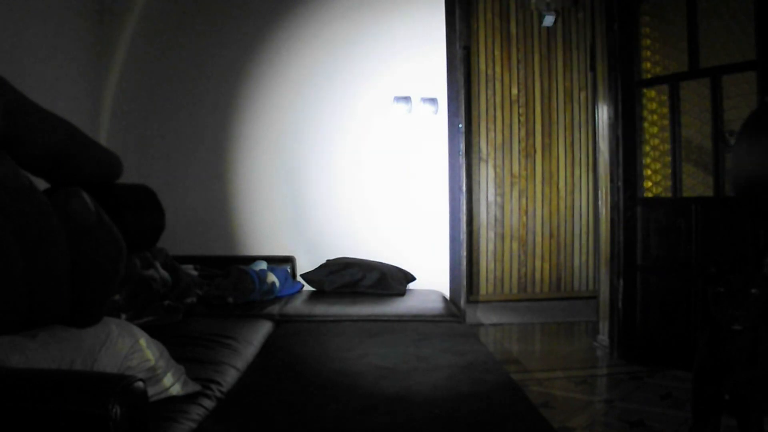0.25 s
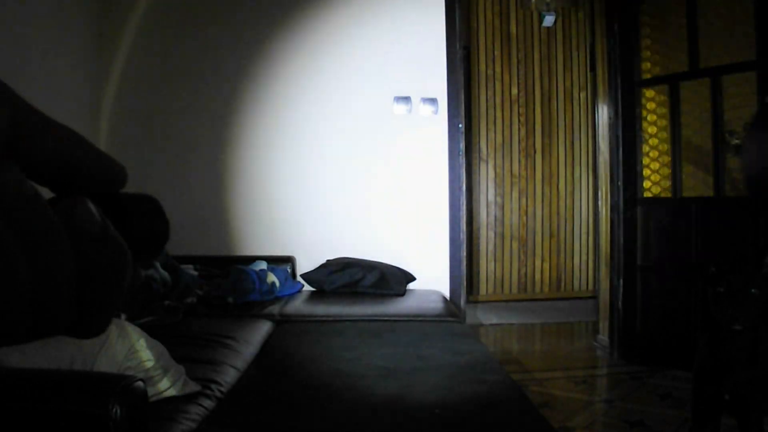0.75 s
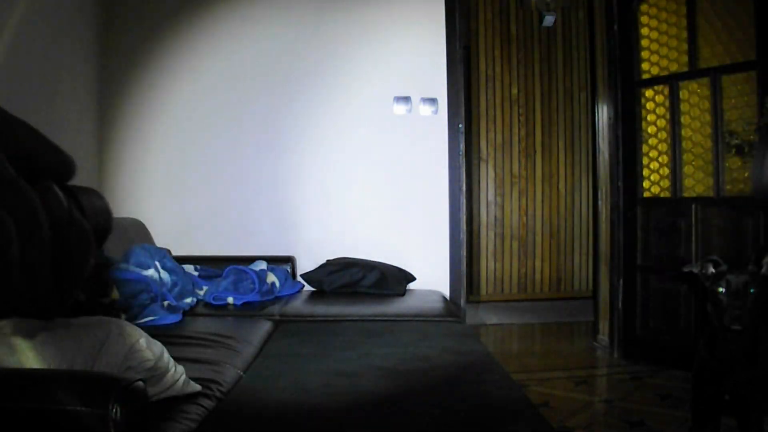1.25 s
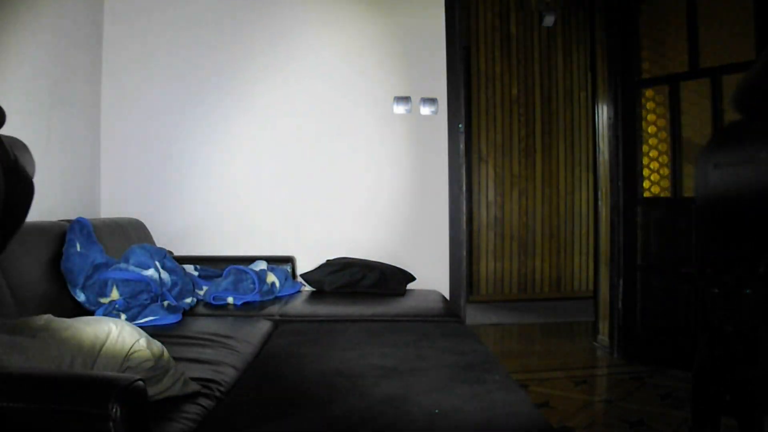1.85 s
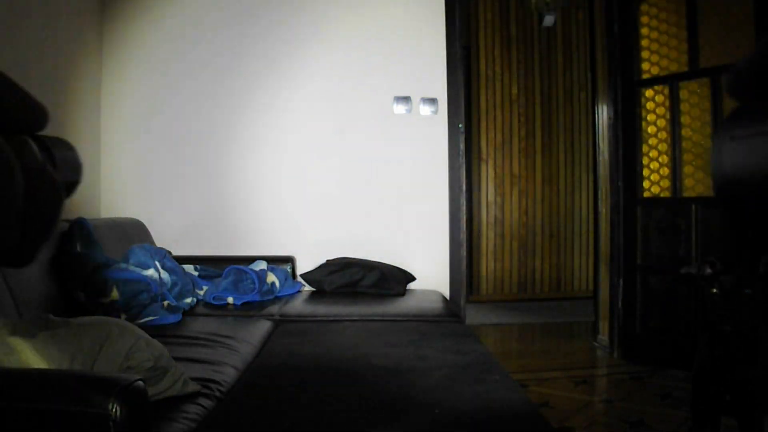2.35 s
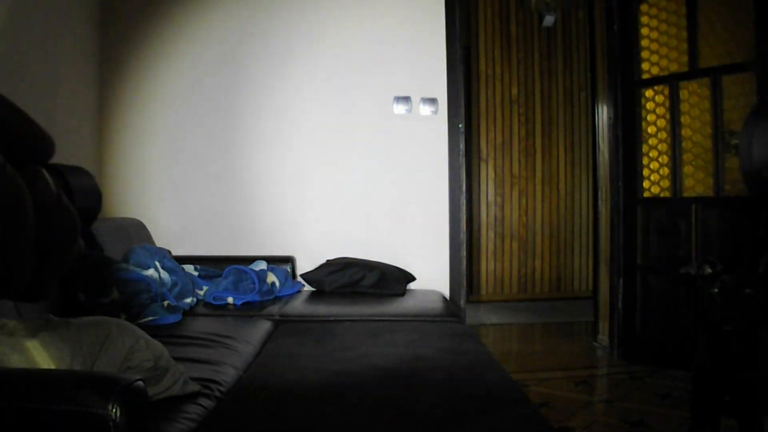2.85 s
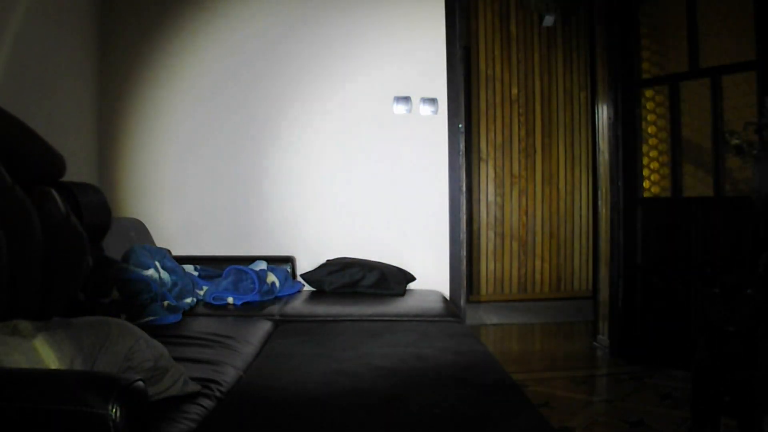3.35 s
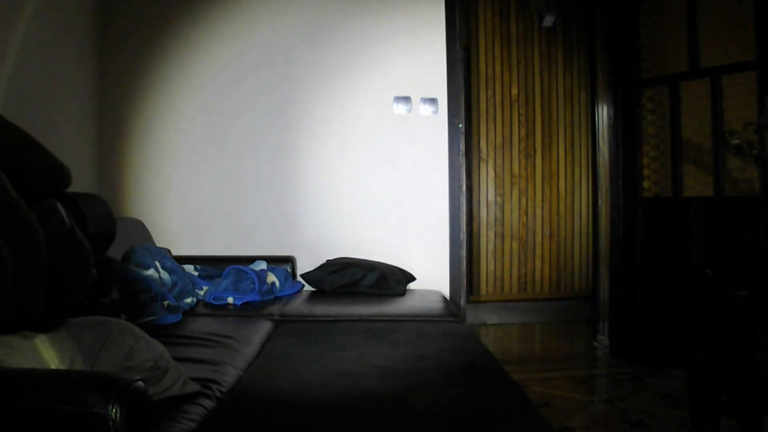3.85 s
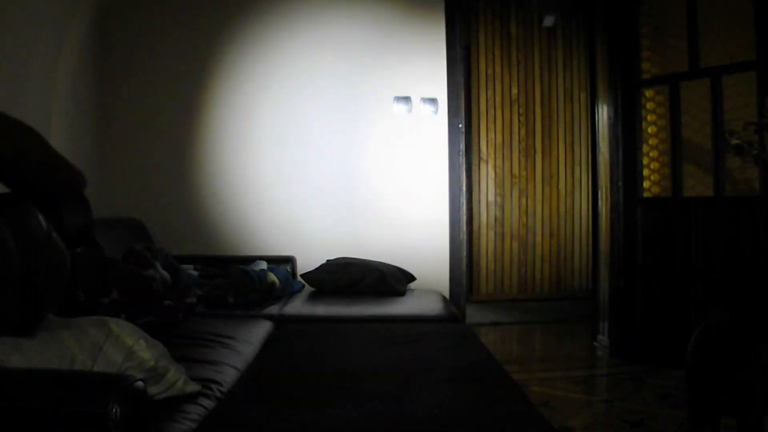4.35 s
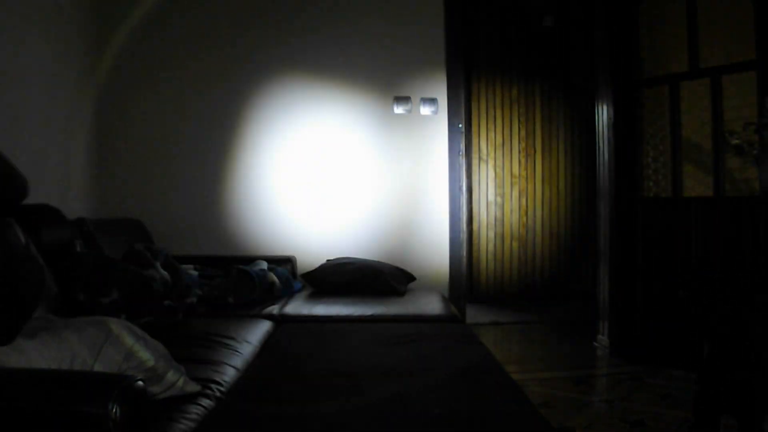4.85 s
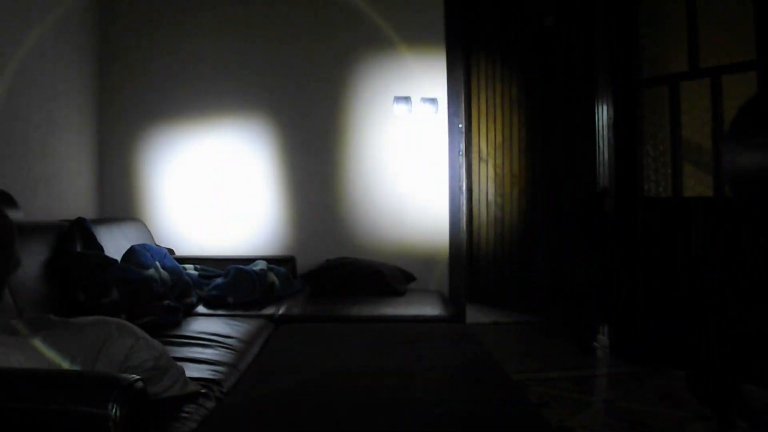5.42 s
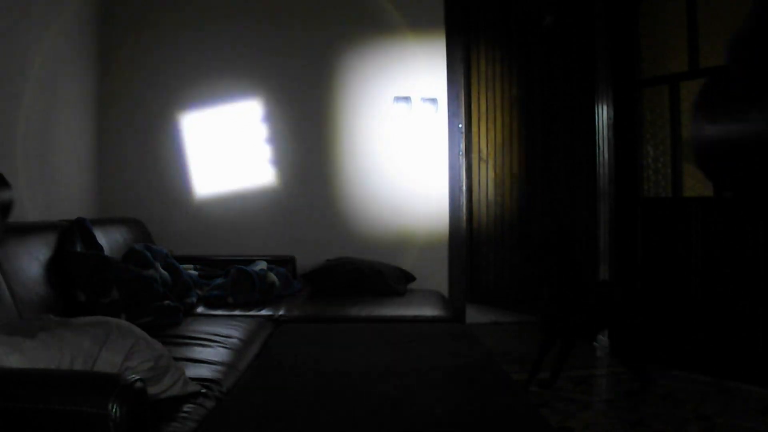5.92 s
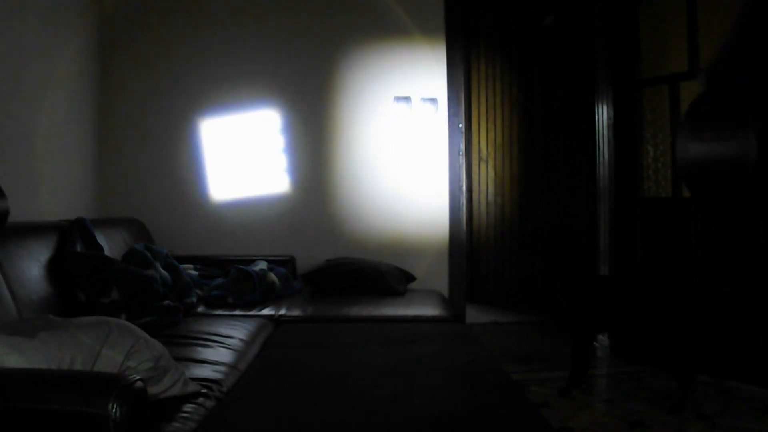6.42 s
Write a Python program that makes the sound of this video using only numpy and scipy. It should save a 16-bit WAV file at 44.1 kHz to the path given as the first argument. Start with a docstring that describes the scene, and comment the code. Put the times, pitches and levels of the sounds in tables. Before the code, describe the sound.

Close to a mono microphone in a small living room, flashlight buttons are clicked in hard, bright, irregular bursts. The loose button rattles and rubs under the thumb, and a spring pings faintly. The busiest, loudest clicking comes around three to five seconds, then sparse clicks, dull handling bumps and three final snaps. Faint hiss and low rumble continue throughout.

```python
"""Flashlight switches are clicked in quick, rattling runs in a small living room.
Each contact is a short noise crack in the hollow torch body, the brighter the harder it is.
A spring pings now and then, and a smaller switch chimes: both are fading, wavering sines.
The thumb drags and rattles the loose button along: shaped noise and small ticks.
Two dull bumps, the room's echo, a low rumble and a faint steady hiss reach a mono microphone."""
import sys
import numpy as np
from scipy import signal
from scipy.fft import rfft, irfft, next_fast_len
from scipy.io import wavfile
from scipy.ndimage import uniform_filter1d

SR = 44100
rng = np.random.default_rng(int(sys.argv[2]) if len(sys.argv) > 2 else 0)


def to_wav(sig):
    """Store sig (one row per channel, or 1-D mono) as 16-bit WAV at the path in sys.argv[1].

    Samples outside -1..1 are clipped; the rate is SR.
    """
    pcm = np.clip(np.atleast_2d(sig), -1, 1) * 32767
    pcm = np.round(pcm).astype(np.int16)
    wavfile.write(sys.argv[1], SR, pcm.T)  # frames by channels


N = 294573

# contacts of the smaller, thinner switch: start_s, level_db (before a common trim),
# hardness_db (snap register against main register)
SMALL_SWITCH_CLICKS = [(4.212, -32.5, 3), (4.222, -21, -28), (4.228, -16, -17), (4.247, -32.5, -2.5),
                       (4.27, -34, -3), (4.528, -27, -12), (4.545, -19, -25), (4.555, -17, -28),
                       (4.566, -24.5, -7.5), (4.615, -32, -4.5), (4.886, -28.5, -8), (5.697, -27, -14),
                       (5.75, -29, -6.5), (5.798, -26.5, -17), (5.831, -27.5, -8), (5.87, -32.5, -37)]
# strokes of the thumb over button and casing: start_s, length_s, level_db (at the start of the stroke)
THUMB_STROKES = [(0, 0.054, -41), (0.264, 0.18, -31.5), (0.717, .1, -36.5), (0.842, 0.057, -35.5),
                 (1.347, 0.19, -44), (1.907, 0.066, -51.5), (2.514, 0.031, -37.5), (2.833, 0.034, -30),
                 (2.901, 0.11, -36), (3.207, 0.028, -30), (3.269, 0.056, -26.5), (3.567, 0.039, -30.5),
                 (3.621, 0.076, -25), (3.922, 0.013, -29), (3.959, 0.052, -28.5), (4.194, .05, -27),
                 (4.401, 0.083, -29), (4.522, 0.087, -30), (4.753, 0.12, -33.5), (5.584, 0.32, -41),
                 (6.136, 0.4, -47), (6.465, 0.085, -27)]
STROKE_SAG_DB = 6  # the thumb eases off by this much over the stroke's length


def amp(db):
    """Amplitude factor of a level in dB."""
    return 10 ** (np.asarray(db) / 20)


def unit(x):
    """Scaled to rms 1."""
    return x / np.sqrt(np.mean(x ** 2) + 1e-20)


def along(points, hz):
    """(Hz, value) points read on a log frequency axis."""
    f, v = np.transpose(points)
    return np.interp(np.log(hz + 1), np.log(f + 1), v)


def curve(rows):
    """(s, value) rows as one value per sample."""
    return np.interp(np.arange(N) / SR, *np.transpose(rows))


def filtered(x, response):
    """x shaped by a response of frequency."""
    m = next_fast_len(len(x) + SR // 20)
    spectrum = rfft(x, m) * response(np.fft.rfftfreq(m, 1 / SR))
    return irfft(spectrum, m)[:len(x)]


def resonances(modes, f):
    """Causal response of (Hz, width Hz, dB) modes, added with alternating sign."""
    total = 0
    for k, (centre, width, db) in enumerate(modes):
        damping = 1j * f * width
        total = total + (-1) ** k * amp(db) * damping / (centre * centre - f * f + damping)
    return total


def noise(colour):
    """Noise of rms 1 with the given spectral shape."""
    return unit(filtered(rng.standard_normal(N), lambda f: amp(along(colour, f))))


def add(track, s, sound):
    """Mix a sound into the track from time s on."""
    start = max(0, round(s * SR))
    part = track[start:start + len(sound)]
    part += sound[:len(part)]


def contact(band_db, ring_hz, lead, soft_stretch):
    """The button slides, snaps home and chatters; the hollow body colours the crack."""
    # registers of a click (main, knock, snap, sheen): low_hz, high_hz
    registers = [(2050, 6000), (450, 1900), (6000, 10500), (10500, 14200)]
    # resonances of the torch body: centre_hz, width_hz, level_db
    body_modes = [(370, 1500, -16.5), (963, 926, -6), (1550, 860, -4), (2120, 434, -2.5), (2619, 114, 6),
                  (2661, 102, 8), (3044, 282, 5.5), (3616, 230, 3.5), (3910, 300, 2), (5050, 590, -1.5),
                  (7250, 493, 4.5), (9350, 820, 0), (11660, 680, -1.5), (13840, 300, -1.5)]
    rise_s, crack_s = 0.00046, 0.0005  # of a hard snap
    slide_db, slide_s = -17, 0.0066  # before the snap
    chatter_db, chatter_s = -15, 0.0067  # after it
    heavy_from_db, heavy_slope = -21.5, 0.66  # above this level: dB more chatter per dB
    grain_db, evenness, strike_db = 6, 0.093, 3
    ring_db, soft_ring, ring_width_hz = -2, 0.86, 520  # soft_ring: dB more ring per dB of softness
    hard_corner_hz, softness_per_octave_db = 10700, 18.3  # a soft contact loses its highs

    t = np.arange(-round(lead * SR), SR // 25) / SR
    # a softer contact sounds the cavity more; where stretched, it also lasts longer
    softness_db = max(0, band_db[0] - band_db[2] - 6.5)
    snap_s = np.where(t < 0, rise_s, crack_s)
    snap = np.exp(-abs(t) / snap_s / (1 + soft_stretch * softness_db))

    # slide and chatter are many tiny catches of uneven strength
    catches = unit(filtered(rng.standard_normal(len(t)), lambda f: f < 600))
    heavy_db = heavy_slope * max(0, band_db[0] - heavy_from_db)
    slide = amp(slide_db) * np.exp(-abs(t) / slide_s)
    chatter = amp(chatter_db + heavy_db) * np.exp(-abs(t) / chatter_s)
    scrape = np.where(t < 0, slide, chatter) * unit(amp(grain_db * catches))

    # the force is a short noise burst, its spectrum very slightly evened out
    force = rfft((snap + scrape) * rng.standard_normal(len(t)))
    force = irfft(force / uniform_filter1d(abs(force), size=25) ** evenness, len(t))

    # each blow lands on another spot and favours other modes
    body = [(hz, width, db + strike_db * rng.standard_normal()) for hz, width, db in body_modes]
    corner_hz = hard_corner_hz * 2 ** (-softness_db / softness_per_octave_db)

    def hollow_body(f):
        # squaring the cavity resonance narrows it
        cavity = amp(ring_db + soft_ring * softness_db) * resonances([(ring_hz, ring_width_hz, 0)], f) ** 2
        return (resonances(body, f) + cavity) / (1 + (f / corner_hz) ** 4)

    crack = filtered(force, hollow_body)

    # each register gets its level as an rms over the few milliseconds of the blow
    blow = .0045 * SR
    sound = np.zeros(len(t))
    for (lo, hi), db in zip(registers, band_db):
        def register(f):
            low_edge = 1 + (lo / (f + 1)) ** min(lo / 150, 18)
            return 1 / low_edge / (1 + (f / hi) ** 20)

        part = filtered(crack, register)
        sound += amp(db) * part / np.sqrt(np.sum(part ** 2) / blow)
    return sound


def click(s, db, hardness_db, sheen_law, knock_db=0, soft_stretch=0.044):
    """One contact as (start s, sound): its hardness sets the balance of all four registers."""
    # ring of the torch cavity, shifting with the grip: time_s, ring_hz (before scatter)
    cavity_ring = [(.1, 2710), (1.4, 2540), (2.9, 3030), (3.3, 3283), (4.6, 3170), (4.8, 3470),
                   (4.88, 3010), (5.7, 3150), (6.6, 2880)]
    lead = .02  # s of sliding ahead of the snap
    # laws of hardness: dB at hardness 0, dB per dB of hardness
    knock = knock_db - 9 + 0.33 * hardness_db
    knock -= 0.16 * max(0, db + 20.5)  # the knock grows less in clicks above -20.5 dB
    sheen = sheen_law[0] + sheen_law[1] * hardness_db
    scatter_hz = 112 * rng.uniform(-1.4, 1)  # from contact to contact
    ring_hz = np.interp(s, *np.transpose(cavity_ring)) + scatter_hz
    band_db = db + np.array([0, knock, hardness_db, sheen])
    return s - lead, contact(band_db, ring_hz, lead, soft_stretch)


def switch_clicks(trim_db=0.97):
    """Both switches snap in their hollow bodies; the smaller one knocks less."""
    # contacts of the main switch: start_s, level_db (before the trim),
    # hardness_db (snap register against main register)
    main_clicks = [(0.119, -33.5, -23.5), (.282, -20.5, -6.5), (0.314, -25.5, 5.5), (.352, -15.5, -5),
                   (.391, -25, -1), (.486, -29, -20), (.64, -23.5, -20.5), (.66, -29, -17),
                   (0.725, -26, -23), (.736, -18.5, -3), (.744, -20.5, -10), (.778, -19.5, -3.5),
                   (.825, -23, -3), (0.865, -21, -3.5), (0.899, -24.5, -5), (.995, -34, -16),
                   (1.013, -18, -21.5), (1.371, -20.5, -4), (1.421, -27.5, -24), (1.444, -26.5, -4.5),
                   (1.484, -29, -24), (2.517, -33, -16), (2.55, -22, -7.5), (2.762, -37, -21.5),
                   (2.837, -28.5, -19), (2.849, -24, -26), (2.858, -17.5, -32), (2.907, -12, -10),
                   (2.918, -16.5, -10), (2.944, -16.5, -16), (2.955, -13.5, -10), (3.069, -31, -17),
                   (3.108, -27, -17), (3.227, -21.5, -15.5), (3.27, -12.5, -30), (3.277, -12.5, -5),
                   (3.288, -24, -23), (3.294, -21, -21), (3.31, -16, -27), (3.323, -16, -8),
                   (3.444, -23.5, -16), (3.587, -23.5, -9.5), (3.622, -14.5, -15), (3.632, -13, -6),
                   (3.644, -30, -0.5), (3.664, -20.5, 1), (3.692, -20.5, -13), (3.713, -18.5, -9.5),
                   (3.807, -31.5, -20), (3.91, -31, -20), (3.937, -22.5, -8), (3.966, -19, -30),
                   (3.974, -7.5, -10.5), (3.98, -16, -3.5), (4.004, -23.5, 0), (4.033, -17, -25),
                   (4.047, -23, -4.5), (4.398, -28, -27), (4.406, -10.5, -9), (4.417, -17, -3.5),
                   (4.441, -22.5, 1.5), (4.466, -19.5, -23), (4.489, -15.5, -7), (4.576, -18, -34),
                   (4.712, -35, -26), (4.752, -26, -19), (4.766, -18.5, -1), (4.778, -18.5, -4.5),
                   (4.804, -19, -7), (4.815, -23, -12), (4.842, -18.5, -13), (4.86, -17.5, -6),
                   (4.876, -13.5, -33), (4.923, -30, -7), (4.938, -33, -11), (5.07, -27, -25.5),
                   (5.08, -17.5, -30), (5.088, -19.5, -17), (5.604, -22.5, -15.5), (5.685, -26.5, -29),
                   (5.742, -21, -29), (5.779, -24, -29), (6.129, -37, -11), (6.328, -37.5, -20),
                   (6.385, -36, -22), (6.479, -14.5, -8.5), (6.515, -18, -9), (6.59, -15.5, -8)]
    track = np.zeros(N)
    for s, db, hardness_db in main_clicks:
        add(track, *click(s, db + trim_db, hardness_db, sheen_law=(-10, 1.3)))
    for s, db, hardness_db in SMALL_SWITCH_CLICKS:
        add(track, *click(s, db + trim_db, hardness_db, sheen_law=(-1.8, 0.6), knock_db=-8.5))
    return track


def rattle():
    """During a firm stroke the loose button ticks at uneven intervals, louder under a firmer thumb."""
    gap_s, level_db, hardness_db, scatter_db = .013, 4, -15.5, 5.5  # level against the stroke
    firm_above_db = -41  # lighter strokes only rub
    track = np.zeros(N)
    for start, length, db in THUMB_STROKES:
        for k, (slip, strength, hardness) in enumerate(rng.uniform(-1, 1, size=(24, 3))):
            delay = gap_s * (k + .5 + .5 * slip)
            if delay < length and db > firm_above_db:
                sag_db = STROKE_SAG_DB * delay / length
                tick_db = db + level_db + scatter_db * strength - sag_db
                tick_hardness_db = hardness_db + scatter_db * hardness
                # the ticks have a duller sheen than the clicks
                tick = click(start + delay, tick_db, tick_hardness_db, sheen_law=(-21, 1.2), soft_stretch=0)
                add(track, *tick)
    return track


def handling(grain_db=4, grain_hz=90):
    """The thumb drags over the casing in small uneven slips; each stroke rises, sags and lets go."""
    # colour of the rubbing: frequency_hz, relative_level_db (per Hz)
    rub_colour = [(800, -56.5), (1500, -16.5), (2100, -24.5), (2900, 2.5), (3300, 1.5), (4200, -13.5),
                  (5000, -17), (6100, -26), (7200, -22), (11700, -33.5), (14000, -59)]
    attack_s, release_s = 0.0047, 0.013
    pressure = np.full(N, amp(-59))  # the hand never lies quite still
    t = np.arange(SR // 2) / SR
    for start, length, db in THUMB_STROKES:
        rise = np.minimum(t / attack_s, 1)
        release = np.exp(-np.maximum(t - length, 0) / release_s)
        add(pressure, start, rise * release * amp(db - STROKE_SAG_DB * t / length))
    slips = unit(filtered(rng.standard_normal(N), lambda f: 1 / (1 + (f / grain_hz) ** 2)))
    return pressure * unit(noise(rub_colour) * amp(grain_db * slips))


def ringing(events, modes, attack_s, blur_hz):
    """Blows on a set of modes; reflections make each fading line waver."""
    track, t = np.zeros(N), np.arange(SR // 2) / SR
    for s, db in events:
        for hz, mode_db, t60 in modes:
            waver = unit(filtered(rng.standard_normal(len(t)), lambda f: 1 / (1 + (f / blur_hz) ** 2)))
            line = np.sin(2 * np.pi * hz * t + waver)
            fade = amp(db + mode_db - 60 * t / t60)
            add(track, s, line * fade * (1 - np.exp(-t / attack_s)))
    return track


def spring_pings():
    """The plucked spring rings in a few high modes."""
    # plucks of the spring: start_s, level_db
    plucks = [(.004, -40), (.352, -35), (1.013, -29.5), (2.858, -28.5), (3.631, -36), (3.973, -27),
              (4.417, -36), (6.591, -47)]
    # modes of the spring: pitch_hz, level_db (added to the pluck), t60_s
    spring_modes = [(7400, -17, .5), (7480, -11, .13), (4080, -3, .18)]
    return ringing(plucks, spring_modes, attack_s=.0006, blur_hz=58.46)


def small_switch_chimes():
    """The smaller switch sings higher, following the treble of each of its clicks."""
    # modes of the smaller switch: pitch_hz, level_db (added to the chime), t60_s
    chime_modes = [(6800, -11, 0.15), (7800, 3, 0.3), (8500, -12, 0.29), (11000, -20, 0.077)]
    # 7 dB below the snap register of the untrimmed click
    chimes = [(s, db + hardness_db - 7) for s, db, hardness_db in SMALL_SWITCH_CLICKS]
    return ringing(chimes, chime_modes, attack_s=0.0022, blur_hz=160)


def handling_bumps():
    """Dull bumps of handling ring in a set of low modes."""
    # bumps: start_s, level_db
    bump_events = [(5.082, -40.5), (5.598, -29.5)]
    # modes of a bump: pitch_hz, level_db (added to the bump), t60_s
    low_modes = [(121, 4, 0.3), (146, -9, 0.25), (195, -12.5, 0.12), (289, -6, 0.16), (455, -13, 0.17),
                 (637, -10, 0.095)]
    return ringing(bump_events, low_modes, attack_s=0.0034, blur_hz=20.6)


def room_tail(build_s=0.00073, early_db=3, early_s=0.03):
    """A diffuse echo: near walls first, then a decay whose speed depends on frequency."""
    # decay of the living room: frequency_hz, t60_s
    decay_times = [(400, 1), (1400, 0.35), (3300, 0.47), (7500, 0.39), (13000, 0.4)]
    # colour of the echo: frequency_hz, level_db
    echo_colour = [(300, -2.5), (1200, -5), (2000, 2), (2500, -2), (3150, -1), (4000, 4), (5100, -1.5),
                   (6000, -2.5), (7500, -5), (9500, -13), (12000, -7), (15000, -11)]
    hz, t, z = signal.stft(rng.standard_normal(SR // 2), SR, nperseg=256)
    decay = amp(-60 * t / along(decay_times, hz)[:, None])
    tail = signal.istft(z * decay, SR, nperseg=256)[1]
    t = np.arange(len(tail)) / SR
    build = 1 - np.exp(-(t / build_s) ** 2)
    tail = tail * build * amp(early_db * np.exp(-t / early_s))
    # energy 1 before the colour
    return filtered(tail / np.linalg.norm(tail), lambda f: amp(along(echo_colour, f)))


def room(direct):
    """The echo of clicks, rattle and rubbing; sounds within each ninth of a second share one random tail."""
    # echo against direct sound as the torch is turned and moved: time_s, level_db (before echo colour)
    echo_level = [(.3, -6.5), (3.2, -4.5), (3.7, -3.5), (4.85, -4.5), (5.08, 3.5), (5.7, -3)]
    sent, echo = direct * amp(curve(echo_level)), np.zeros(N)
    step = SR // 9
    for start in range(0, N, step):
        add(echo, start / SR, signal.fftconvolve(sent[start:start + step], room_tail()))
    return echo


def background(hiss_db=-51, hollow_db=-57):
    """Steady hiss with two hollow notes, over a low rumble of changing level."""
    # colour of the hiss: frequency_hz, relative_level_db (per Hz)
    hiss_colour = [(110, -3), (180, -3), (364, -5.5), (578, -10.5), (836, -0.5), (988, -7.5), (1210, -12.5),
                   (1600, -9.5), (1690, -10.5), (2110, -11), (2230, -18), (2940, -8), (6520, -26),
                   (11600, -26.5), (15000, -74)]
    # hollow notes in the hiss: centre_hz, width_hz, relative_level_db
    hollow_modes = [(894, 16, -1.5), (1224, 51, 1.5)]
    # colour of the rumble: frequency_hz, relative_level_db (per Hz)
    rumble_colour = [(12, 1), (22, 7.5), (33, -8), (45, 8), (56, -7.5), (75, -9), (115, -9.5), (177, -23),
                     (290, -24), (480, -84)]
    # course of the rumble: time_s, level_db
    rumble_level = [(0, -47.5), (4.95, -47), (5.12, -38), (5.5, -45.5), (5.62, -37), (5.95, -40),
                    (6.08, -44), (6.68, -44)]
    hiss = amp(hiss_db) * noise(hiss_colour)
    hollow = unit(filtered(rng.standard_normal(N), lambda f: resonances(hollow_modes, f)))
    rumble = amp(curve(rumble_level)) * noise(rumble_colour)
    return hiss + amp(hollow_db) * hollow + rumble


def scene():
    """Clicks, rattle and rubbing with their echo, springs, bumps and room noise, alike in both channels."""
    torch = switch_clicks() + rattle() + handling()
    rings = spring_pings() + small_switch_chimes() + handling_bumps()
    mono = torch + room(torch) + rings + background()
    return np.array([mono, mono])


def record(dry):
    """Peaks are rounded off towards 0.85 of full scale; the recorder cuts steeply above its band limit."""
    top_hz = 15000
    rounded = dry / (1 + abs(dry / .85) ** 5) ** (1 / 5)
    return signal.sosfilt(signal.butter(20, top_hz, fs=SR, output="sos"), rounded)


dry = scene()
out = record(dry)
to_wav(out)
```